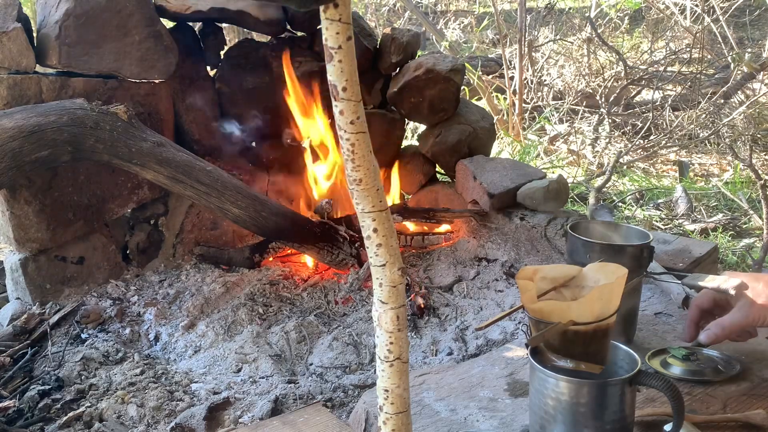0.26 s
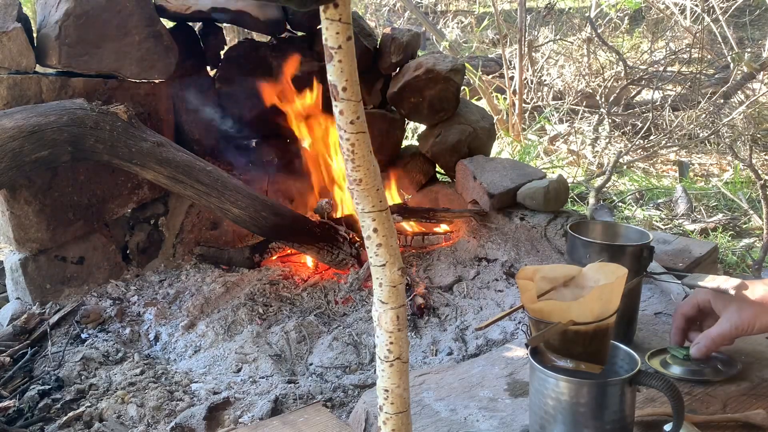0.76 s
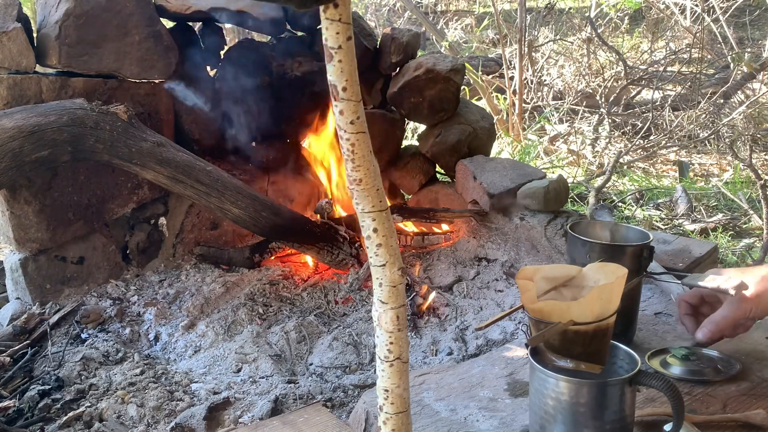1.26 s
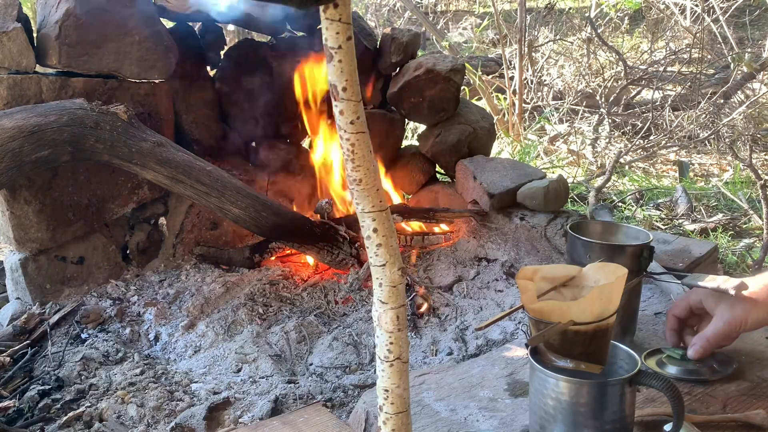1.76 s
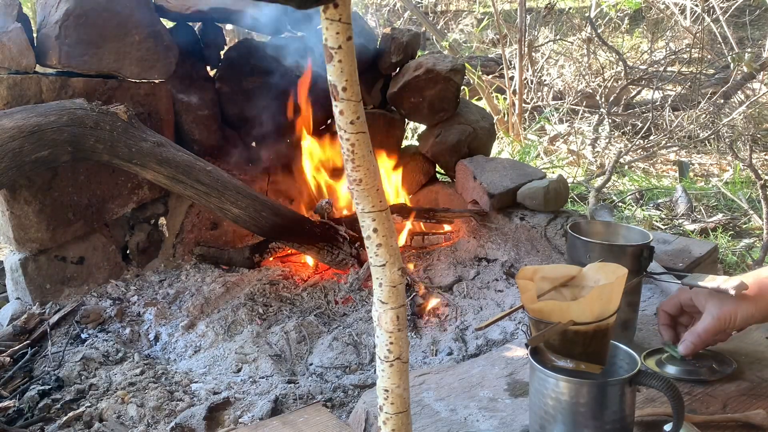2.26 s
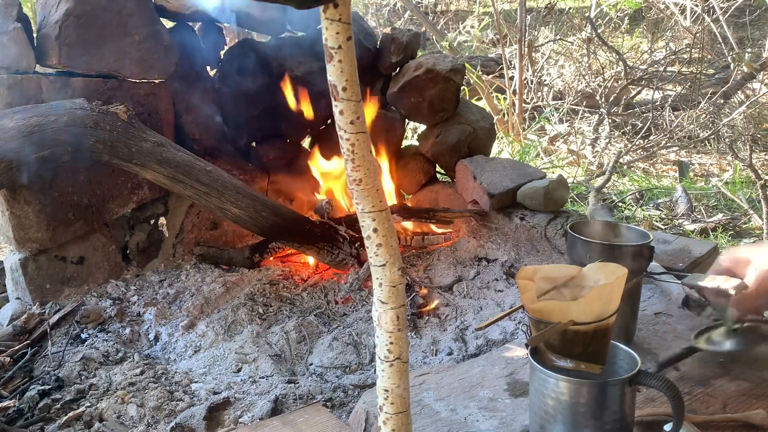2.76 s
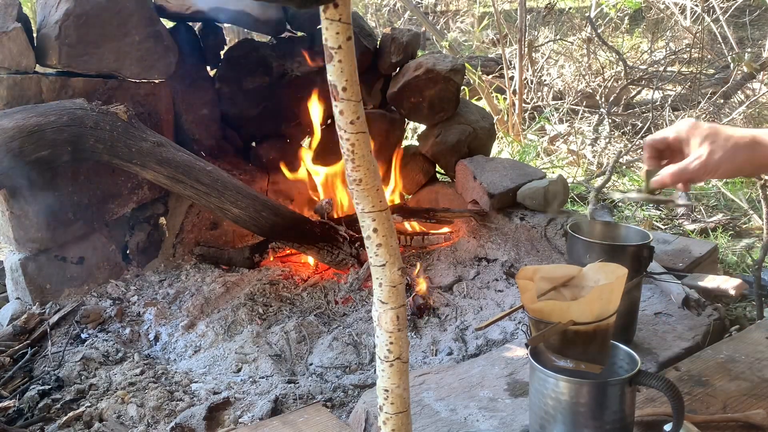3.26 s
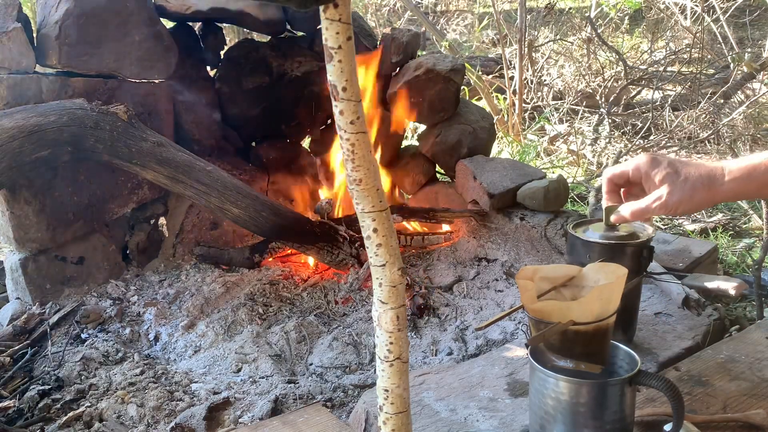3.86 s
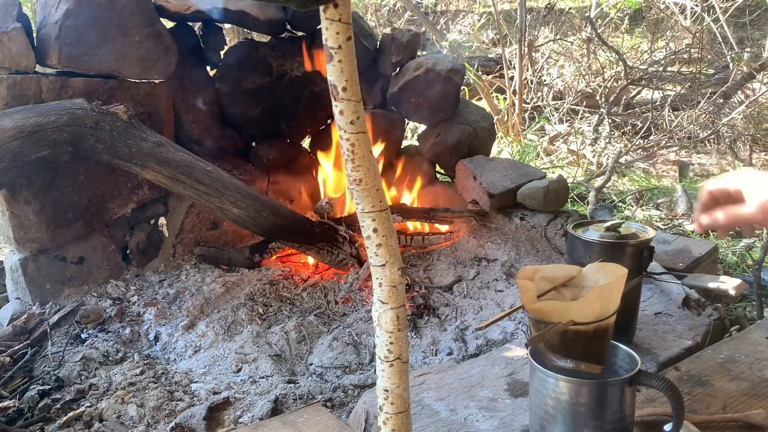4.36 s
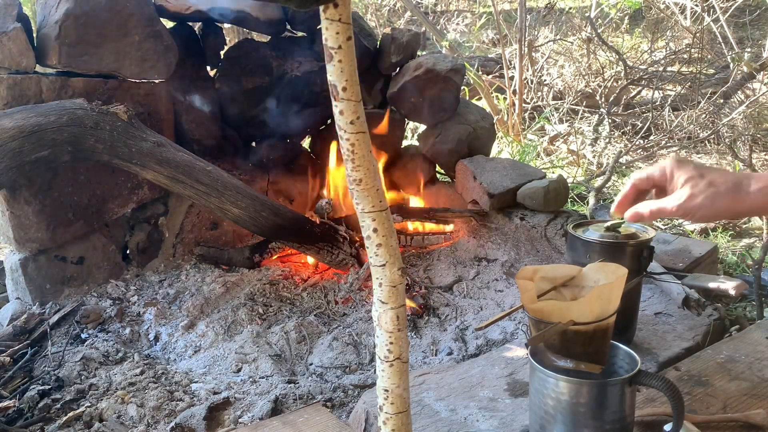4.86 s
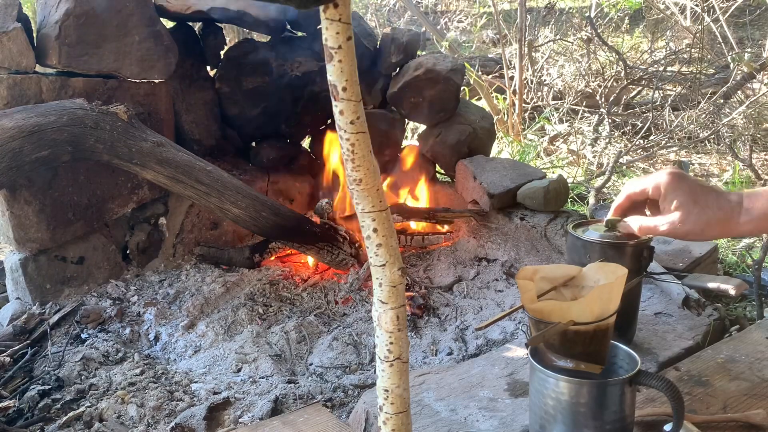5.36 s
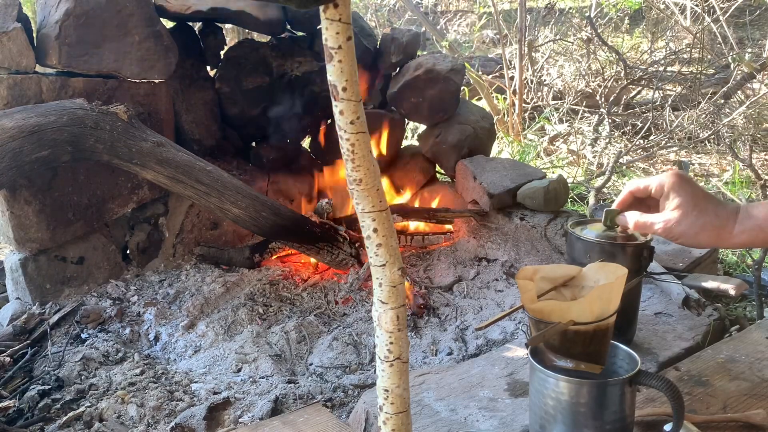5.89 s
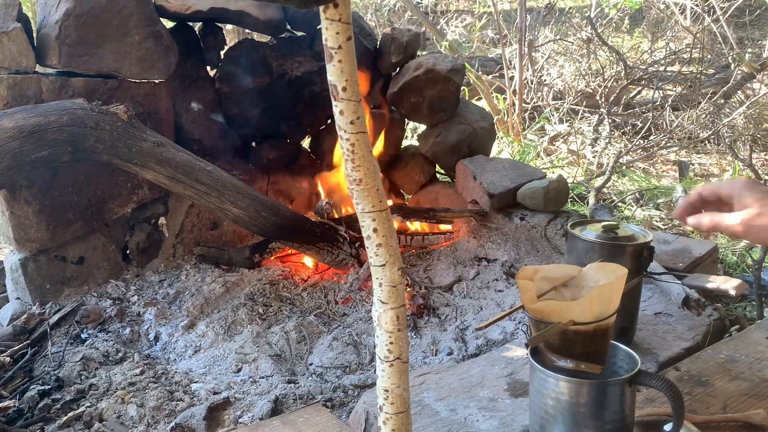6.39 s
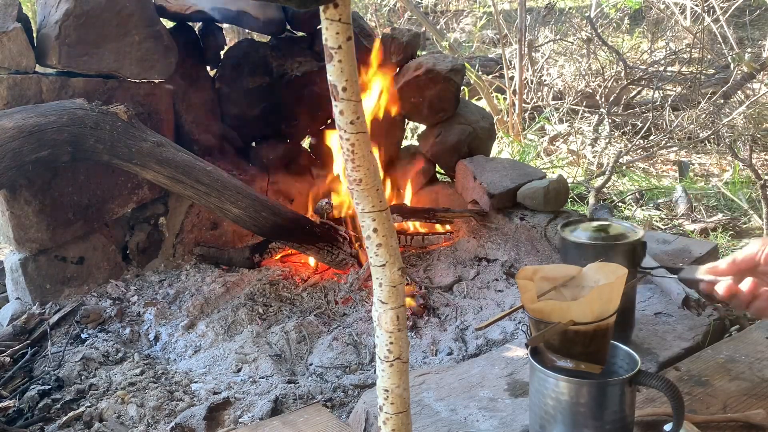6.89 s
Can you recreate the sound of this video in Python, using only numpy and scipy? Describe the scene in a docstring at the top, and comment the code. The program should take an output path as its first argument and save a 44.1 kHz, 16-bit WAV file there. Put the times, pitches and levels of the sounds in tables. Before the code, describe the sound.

A thin metal lid clatters on flat stone, then taps and scrapes onto a metal pot beside a softly crackling campfire, distant engine fading.

```python
"""Lid, pot and campfire

A thin metal lid clatters on a flat stone, then is set on a pot and nudged into place, right of a stereo microphone:
each contact is a noisy chatter that drives damped modes of the metal. A campfire pops (filtered bursts), hisses and
flutters (coloured noise) and gulps (short low tones); far off an engine, a stack of sines, gains speed and fades
into a low rumble of noise."""
import sys
import numpy as np
from scipy import signal
from scipy.fft import rfft, irfft, next_fast_len
from scipy.io import wavfile
from scipy.ndimage import uniform_filter1d

SR = 44100
rng = np.random.default_rng(int(sys.argv[2]) if len(sys.argv) > 2 else 0)


def output_pcm(signal):
    """Save a mono or channel-first signal as 16-bit PCM at the path in sys.argv[1].

    Samples are clipped to [-1, 1] before scaling.
    """
    pcm = np.clip(np.atleast_2d(signal).T, -1, 1) * 32767
    wavfile.write(sys.argv[1], SR, np.round(pcm).astype(np.int16))


N = 314433
T = np.arange(N) / SR

# far engine: (time [s], cycle rate [Hz], level [dB])
ENGINE = [(0.0, 21.32, -44.5), (0.34, 20.14, -41), (0.466, 20.51, -44), (1.94, 23.46, -45),
          (2.58, 25.69, -45.5), (2.97, 25.75, -49.5), (3.211, 24.2, -86)]
# engine orders: (multiple of the cycle rate, relative level [dB])
ENGINE_ORDERS = [(2, -12), (4, -2), (5, -2.5), (9, -23)]
# moving air: (time [s], rumble level [dB], flame flutter level [dB])
AIR_LEVELS = [(0.0, -47, -55.5), (0.32, -50, -56.5), (2.24, -53, -56.5), (2.56, -46, -57), (3.28, -50, -59),
              (3.99, -49, -52.5), (4.37, -50, -56.5), (4.85, -52.5, -53), (6.21, -50.5, -55),
              (7.13, -58, -55)]
# spectra of the far rumble, flame flutter and fire hiss: (frequency [Hz], relative density [dB per Hz])
RUMBLE_SPECTRUM = [(12, -75), (20, -38), (31, -14), (54, 4), (102, 6.5), (118, 5), (135, -11.5), (170, -19),
                   (220, -25), (370, -120)]
FLUTTER_SPECTRUM = [(76, -6.5), (130, -4), (166, -5), (354, -14.5), (513, -18), (682, -20), (1400, -31),
                    (2500, -41), (3250, -48), (5500, -120)]
HISS_SPECTRUM = [(700, -58), (1200, 5), (3100, -1), (9800, -2.5), (11000, -9), (14300, -8.5), (15300, -38),
                 (16400, -45)]
# fire hiss: (time [s], level [dB])
HISS_LEVELS = [(0, -69.5), (.35, -70), (.8, -74.5), (2.3, -72), (3.3, -76), (4.5, -74.5), (6.3, -72),
               (7.13, -74.5)]
# soft puffs of the flames: (time [s], relative level [dB], pitch [Hz])
PUFFS = [(1.845, -35.5, 426), (2.518, -28, 131), (4.291, -34, 179), (4.609, -31, 130), (4.66, -30, 224),
         (4.916, -30.5, 231), (5.281, -30.5, 129), (6.283, -31, 197), (6.44, -28.5, 180)]
# fire pops: (time [s], peak level before the stereo ports [dB], centre [Hz])
POPS = [(0.853, -36, 10190), (1.407, -40, 9820), (1.467, -28, 10400), (1.6179, -30, 9400),
        (1.6926, -42, 10400), (1.7991, -43.5, 8890), (1.9871, -29.5, 9790), (2.05, -25.5, 11100),
        (2.1106, -32.5, 9000), (2.1291, -45, 9206), (2.4665, -34, 10500), (2.479, -29.5, 9400),
        (2.6615, -44.5, 8800), (2.8707, -39, 8310), (2.978, -32, 7660), (3.113, -42.5, 8900),
        (3.2266, -44.5, 9700), (3.8878, -37, 8900), (3.932, -39, 10700), (4.5432, -38, 8460),
        (4.887, -34.5, 9400), (5.0338, -38, 8500), (5.3617, -38, 13200), (6.043, -37, 8450),
        (6.4914, -46, 7500), (6.553, -36, 10100), (6.5848, -40.5, 6750), (6.6572, -39, 8320),
        (6.6732, -35, 7950), (6.6816, -24, 8000), (6.687, -46, 8800), (6.753, -31.5, 8850),
        (6.8627, -42.5, 8030)]
# contacts of the lid: (time [s], level [dB], bass re mid [dB], brightness re mid [dB], rattle centre [Hz],
#   rattle re clear modes [dB], rise [ms], chatter decay by 60 dB [s]); rise and decay are limited in decays()
STONE_CONTACTS = [(.4, -44.5, -17, -4.5, 2050, 9, 1.6, 0.089), (.48, -32.5, -14, -9, 2010, 17, 1.7, 0.12),
                  (.498, -47, -4, 2, 1320, 11, 1.1, 0.19), (.541, -30.5, -13, -8.5, 1156, -22, 0.55, 0.18),
                  (.573, -32, -9, -5, 1490, -9, 2.7, 0.083), (.597, -36, -8.5, -33, 844, 6, 0.88, 0.17),
                  (.624, -37, -9, -26, 1150, 8, 5.5, 0.03), (.848, -64, -19, -14, 1910, 8, 2.3, 0.18),
                  (1.031, -45.5, -22, -8.5, 1390, -7, 1.9, 0.24),
                  (1.05, -36.5, -4.5, -6.5, 1840, -7, 1.4, 0.064),
                  (1.07, -36.5, -24, -25, 1200, 2, 0.52, 0.066),
                  (1.088, -45.5, 0, -6, 1850, -9, 1.3, 0.088),
                  (1.318, -48, -14, -8.5, 1710, -21, 1.1, 0.13),
                  (1.343, -49, -14, -7.5, 1500, -13, 3.64, 0.046),
                  (1.427, -49, -13, -4, 2100, -30, 6.1, 0.45),
                  (1.473, -30, -43, -10.5, 1110, -15, 0.62, 0.11),
                  (1.495, -29.5, -7, -11.5, 1435, 4.5, 0.92, 0.15),
                  (1.512, -33, -13, -32, 1120, -1, 2, 0.073), (1.53, -34, -42, -31, 910, 6, 1.3, 0.047),
                  (1.546, -41, -23, -24, 1004, 5, 1.3, 0.046), (1.561, -51, -25, -26, 1200, -3, 2, 0.11),
                  (1.579, -55.5, 2.5, -5, 1750, 22, 0.69, 0.18),
                  (1.638, -56.5, -2, -4.5, 1180, -1, 0.82, 0.18),
                  (1.948, -61.5, -14, -10, 1960, 15, 0.93, 0.18),
                  (2.05, -53, -23, -7, 1750, 31, 0.58, 0.11), (2.16, -57, -16, -27, 1160, 10, 1.8, 0.078),
                  (2.302, -46.5, -3, -14.5, 1010, 1, 0.88, 0.15),
                  (2.47, -50, -5.5, -9.5, 1722, -1, 0.9, 0.065)]
POT_CONTACTS = [(3.481, -57, -10, -1, 2100, -24, 0.53, 0.31),
                (3.506, -50.5, -10, -7.5, 560, -3, 0.81, 0.28),
                (3.547, -60, -19, -17, 2070, -14, 3.7, 0.33), (3.616, -55.5, -8, 2, 2050, -16, 0.67, 0.16),
                (3.658, -62, -13, 2, 3300, -12, 36, 0.53), (3.722, -48, 3, 4.5, 2000, -24, 3.8, 0.37),
                (3.775, -62, 16.5, 13.5, 3000, -13, 1, 0.22), (3.799, -61, 18.5, 6.5, 2380, 13, 5, 0.099),
                (3.832, -51, -20, -1.5, 1970, -6, 1.5, 0.046), (3.907, -59, 11.5, 7.5, 2900, 1, 1.2, 0.068),
                (3.981, -51.5, 1, 0.5, 1730, -25, 1.2, 0.086), (4.024, -59, 16.5, 6.5, 2840, -3, 2.3, 0.12),
                (4.044, -52, 4.5, -1, 2070, -8, 0.78, 0.12), (4.073, -41, 4, -3.5, 1830, -5, 2, 0.06),
                (5.064, -53, -6, -4.5, 1970, 11, 0.65, 0.032), (5.165, -48.5, 0, -5, 1920, 14, 0.5, 0.05),
                (5.18, -62, 2, 1, 1800, -21, 1.7, 0.16), (5.236, -55, 8, -2, 2050, -26, 1.2, 0.053),
                (5.258, -57.5, 1, -11, 1840, -19, 2.7, 0.048),
                (5.455, -51, -26, -14, 2000, -13, 2.2, 0.038),
                (5.482, -53.5, -18, -1.5, 1660, 1, 0.34, 0.11), (5.59, -74, 5, 13, 3650, -22, 2.8, 0.11),
                (5.62, -58, -6, 0, 527, -4, 0.89, .25), (5.696, -43, -13, -11, 544, 4, 0.73, 0.17),
                (5.718, -55.5, -8, -1, 1930, -12, 2.9, .045), (5.798, -61.5, 18, -5, 2040, -18, 1.6, .04),
                (5.825, -52, 14.5, 9, 2000, -33, 3.1, 0.098), (5.84, -53.5, 22, 14, 2430, -12, 0.95, 0.022),
                (6.018, -57.5, -27, -11, 1520, -4, 0.39, 0.31), (6.072, -52, 9, -14, 1520, -6, 0.34, 0.11),
                (6.121, -60, -4, -17, 1600, 8, 1.3, 0.11), (6.202, -52, 12, -10, 1770, 10, 1.6, 0.079),
                (6.226, -50, 11.5, -5, 1900, -6, 1.8, 0.12), (6.877, -55, 1, -7.5, 1750, -7, 2, 0.11)]
# modes of the lid alone and of lid and pot together: (frequency [Hz], free width [Hz], relative level [dB])
LID_MODES = [(414, 46, -4), (920, 55, 7), (1175, 31, -15), (1330, 50, 0.5), (1562, 135, 3.5),
             (2020, 38, 13.5), (2640, 60, -8), (3260, 55, 5.5), (4000, 61, -13), (4140, 290, -8),
             (4860, 23, -24), (5750, 36, -14), (6290, 43, -11), (7030, 26, -23), (9300, 180, -17),
             (9920, 100, -7)]
LID_AND_POT_MODES = [(364, 18, 1), (594, 27, 12), (1275, 22, -11), (1440, 12, -28), (1794, 11, -5.5),
                     (2020, 16, 11.5), (2397, 9.2, -12), (2560, 16, -11), (2956, 12.3, -3.5),
                     (3190, 27, -12.5), (3697, 25, -5), (4170, 29, -11.5), (4420, 25, -5.5),
                     (5540, 130, -25.5), (6170, 250, -13), (7110, 290, -22.5), (8130, 75, -11.5),
                     (9910, 83, -8), (12500, 350, -15)]
# long ring of the lid: (frequency [Hz], relative level [dB], decay by 60 dB [s])
LONG_RING = [(1335, -64, 1), (1608, -59, .9), (1635, -57, .45), (2110, -57, 0.2), (7650, -46, 0.14)]
# extra rattle re clear modes in bass, mid, upper mid and treble: (level [dB])
REGISTER_BLUR_DB = [-3, 1, 1, 4]
# upper limits of bass, mid and upper mid: (frequency [Hz])
REGISTER_TOP_HZ = [470, 2350, 5600]

STONE_HELD_HZ, POT_HELD_HZ = 50, 36  # fingers and contact widen every mode by this much
STONE_BEND, POT_BEND = .015, .011  # spread of the detuning, share of pitch
STONE_TREBLE_DB, POT_TREBLE_DB = -3.5, -2.9  # treble re upper mid at the start of a contact
TREBLE_FADE_DB_S = 57  # the treble dies this much faster than the chatter
STONE_LEAN_DB, POT_LEAN_DB = -1.5, -0.5  # left minus right in the bass
STONE_ECHO_DB, POT_ECHO_DB = -5.5, -1  # gain of the echo filter
POP_T60_S = 0.07


def undb(db):
    """Level law: 20 dB is a factor of ten in amplitude."""
    return 10 ** (np.asarray(db) / 20)


def unit(x):
    """Normalisation to an rms of 1."""
    return x / np.sqrt(np.mean(x ** 2))


def add(out, s, sound):
    """Superposition: mixes a short sound in at time s."""
    i = int(s * SR)
    out[i:i + len(sound)] += sound[:N - i]


def walk(rate):
    """Slow random modulation: levels held 1 / rate s and smoothed twice; spread near 1."""
    hold = int(SR / rate)
    steps = np.repeat(rng.standard_normal(N // hold + 1), hold)
    return 1.23 * uniform_filter1d(uniform_filter1d(steps, hold), hold)[:N]


def coloured(spectrum):
    """Spectral shaping: white noise weighted by the given spectrum, at an rms of 1."""
    hz, db = np.transpose(spectrum)
    size = next_fast_len(N)
    bins_hz = np.fft.rfftfreq(size, 1 / SR)
    gain = undb(np.interp(np.log(bins_hz + 1), np.log(hz), db, left=-90, right=-90))
    return unit(irfft(rfft(rng.standard_normal(size)) * gain, size)[:N])


def mode(x, hz, width_hz):
    """Damped resonance: a wider mode dies sooner; a unit click rings it at size 1."""
    pole = np.exp((2j * np.pi * hz - np.pi * width_hz) / SR)
    return signal.lfilter([1], [1, -pole], x).imag


def decays(rise_s, t60_s):
    """Exponential build-up and decay: an envelope of peak 1, within limits of rise and decay."""
    t = T[:16384]
    rise = 1 - np.exp(-t / np.clip(rise_s, .0001, .03))
    shape = rise * 1000 ** (-t / np.clip(t60_s, .01, .25))
    return shape / shape.max()


def ports(x, lag, pan_db, other=0):
    """Interaural cues: the left port lags by lag samples and leans pan_db, mostly in the bass; other differs."""
    size = next_fast_len(N)
    f = np.fft.rfftfreq(size)  # cycles per sample
    lean = undb(pan_db / 2 / (1 + (f * SR / 2500) ** 2))
    left = irfft(rfft(x + other, size) * lean * np.exp(-2j * np.pi * f * lag), size)
    right = irfft(rfft(x - other, size) / lean, size)
    return np.array([left, right])[:, :N]


def stones(x, db):
    """Scattering: quick echoes off the stones of the hearth, too small to turn back the bass."""
    t = T[:1500]
    echoes = rng.standard_normal(len(t)) * np.exp(-t / 0.0071)
    echoes = echoes / np.sqrt(np.sum(echoes ** 2))
    x = signal.lfilter(*signal.butter(2, 700, "high", fs=SR), x)
    return undb(db) * signal.fftconvolve(x, echoes)[:N]


def engine():
    """Harmonic orders: sines at multiples of the cycle, each wavering on its long way through the air."""
    s, hz, db = np.transpose(ENGINE)
    turn = 2 * np.pi * np.cumsum(np.interp(T, s, hz)) / SR
    stack = np.zeros(N)
    for multiple, order_db in ENGINE_ORDERS:
        level = undb(order_db + 0.38 * walk(4.69))
        phase = 0.45 * walk(3.96) + 2 * np.pi * rng.random()
        stack += level * np.sin(multiple * turn + phase)
    return unit(stack) * undb(np.interp(T, s, db, right=-120))


def distance():
    """Partial coherence: engine and rumble reach both ports, with a weak rumble that differs between them."""
    s, rumble_db, _ = np.transpose(AIR_LEVELS)
    level_db = np.interp(T, s, rumble_db)
    far = engine() + undb(level_db) * coloured(RUMBLE_SPECTRUM)
    return ports(far, 2.1, -4.0, undb(level_db - 26) * coloured(RUMBLE_SPECTRUM))


def hiss():
    """Broadband noise: the fire's hiss, nearly as strong in the part that differs between the ports."""
    level = undb(np.interp(T, *np.transpose(HISS_LEVELS)) + 0.9 * walk(9))
    other = undb(-0.1) * level * coloured(HISS_SPECTRUM)
    return ports(level * coloured(HISS_SPECTRUM), 0, -0.11, other)


def puffs():
    """Heavily damped oscillation: a gulp of air at the flames, a couple of low cycles."""
    out, t = np.zeros(N), T[:4096]
    for s, db, hz in PUFFS:
        cycles = hz * t
        swell = cycles * np.exp(1 - cycles / 0.43)
        add(out, s, undb(db) * np.sin(2 * np.pi * cycles) * swell)
    return out


def flames():
    """Amplitude modulation: low noise follows the uneven gusts of the flames, joined by puffs."""
    s, _, flutter_db = np.transpose(AIR_LEVELS)
    gust = undb(np.interp(T, s, flutter_db) + .9 * walk(9.6) + 1.8 * walk(50))
    other = undb(-47.0) * gust * coloured(FLUTTER_SPECTRUM)
    return ports(gust * coloured(FLUTTER_SPECTRUM) + puffs(), 12.56, 0.98, other)


def pops():
    """Impulse excitation: a sharp wide crack, as a pocket in the wood bursts, within faint decaying noise."""
    out, t = np.zeros(N), T[:4096]
    for s, db, hz in POPS:
        burst = undb(-24.5) * rng.standard_normal(len(t)) * 1000 ** (-t / POP_T60_S)
        burst[50] += 1  # the crack falls 50 samples into the burst, with faint noise before and after it
        body = mode(mode(burst, hz, .5 * hz), 1.1 * hz, 0.44 * hz)
        edge = mode(mode(burst, 12500, 1700), 17800, 7900)
        crack = np.diff(body + undb(-1.5) * edge)
        add(out, s, undb(db) * crack / np.abs(crack).max())
    return out


def chatter(shape, rise_ms, tick_db):
    """Repeated impact: a tick and tiny uneven bounces, gathered in clumps, form the driving force."""
    grit_db = 3.2 * np.minimum(rng.exponential(size=len(shape)), 5)
    grit = rng.standard_normal(len(shape)) * undb(grit_db)
    clumps = np.repeat(rng.standard_normal(len(shape) // 128), 128)
    push = unit(grit * undb(1.9 * clumps)) * shape
    push[44] += undb(tick_db) / max(rise_ms, .3)  # a quick contact lands with a harder tick
    return push


def clear_modes(push, modes, rattle_hz, blur_db, held_hz, bend_share):
    """Modal superposition: each touch lands elsewhere and bends the sheet, so other modes speak, detuned."""
    registers = [0, 0, 0, 0]
    place = rng.standard_normal((len(modes), 2))
    for (hz, width_hz, db), (strong, bend) in zip(modes, place):
        # modes near the rattle centre lead, more so in a clear touch
        distance_share = min(3 * abs(np.log2(hz / rattle_hz)), 1)
        spread_db = 4 * strong - max(10 - blur_db, 0) * distance_share
        ring = mode(push, hz * (1 + bend_share * bend), width_hz + held_hz)
        registers[np.searchsorted(REGISTER_TOP_HZ, hz)] += undb(db + spread_db) * width_hz / 100 * ring
    return registers


def rattles(push, rattle_hz):
    """High modal density: many weak modes blur into one broad band per register."""
    bands = ((370, 100), (rattle_hz, .38 * rattle_hz), (3500, 2600), (9500, 8500))
    return [mode(mode(push, hz, width_hz), hz, width_hz) for hz, width_hz in bands]


def long_ring(push, ring_db):
    """Light damping: narrow modes ring on, damped unevenly by the grip."""
    out = np.zeros(len(push))
    for hz, db, t60_s in LONG_RING:
        steps = np.repeat(rng.standard_normal(len(push) // 1024), 1024)
        waver_db = 5 * uniform_filter1d(steps, 1024)
        out += undb(db + ring_db + waver_db) * mode(push, hz, np.log(1000) / np.pi / t60_s)
    return out


def lid(contacts, modes, treble_db, tick_db, ring_db, held_hz, bend_share, split_hz):
    """Forced vibration: the chatter of each contact drives clear modes, rattle and long ring of the metal."""
    out = np.zeros(N)
    # body below the split, sheet above
    deep, thin = (signal.butter(2, split_hz, kind, fs=SR) for kind in ("low", "high"))
    for s, level_db, bass_db, bright_db, rattle_hz, blur_db, rise_ms, t60_s in contacts:
        shape = decays(rise_ms / 1000, t60_s)
        push = chatter(shape, rise_ms, tick_db)
        clear = clear_modes(push, modes, rattle_hz, blur_db, held_hz, bend_share)
        rattle = rattles(push, rattle_hz)
        blurs_db = REGISTER_BLUR_DB + blur_db * np.array([0, 1, .7, .2])  # bass keeps a fixed blur
        bass, mid, upper, treble = (unit(unit(ring) + undb(db) * unit(blur))
                                    for ring, blur, db in zip(clear, rattle, blurs_db))
        treble = undb(treble_db - TREBLE_FADE_DB_S * T[:len(shape)]) * treble
        sheet = signal.lfilter(*thin, mid + undb(bright_db) * (upper + treble))
        body = undb(bass_db) * signal.lfilter(*deep, bass)
        sound = np.sqrt(np.mean(shape ** 2)) * (body + sheet)
        add(out, s, undb(level_db) * (sound + long_ring(push, ring_db)))
    return out


def scene():
    """Superposition: far sounds, fire and lid add at the two ports, with hearth echoes of pops and lid."""
    crackle = pops()
    on_stone = lid(STONE_CONTACTS, LID_MODES, STONE_TREBLE_DB, tick_db=20.9, ring_db=-5.9,
                   held_hz=STONE_HELD_HZ, bend_share=STONE_BEND, split_hz=850)
    on_pot = lid(POT_CONTACTS, LID_AND_POT_MODES, POT_TREBLE_DB, tick_db=15.2, ring_db=-36,
                 held_hz=POT_HELD_HZ, bend_share=POT_BEND, split_hz=640)
    return (distance() + hiss() + flames()
            + ports(crackle, -1.14, -1.6, stones(crackle, -27))
            + ports(on_stone, 5.35, STONE_LEAN_DB, stones(on_stone, STONE_ECHO_DB))
            + ports(on_pot, 2.04, POT_LEAN_DB, stones(on_pot, POT_ECHO_DB)))


def record(dry):
    """Band limitation: the recorder cuts steeply above 16400 Hz."""
    return signal.sosfilt(signal.ellip(10, .2, 70, 16400, fs=SR, output="sos"), dry)


dry = scene()
out = record(dry)
output_pcm(out)
```